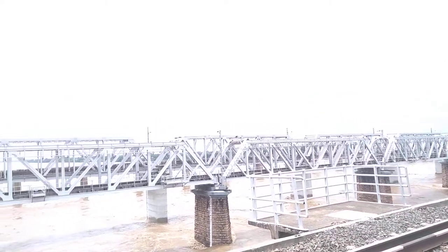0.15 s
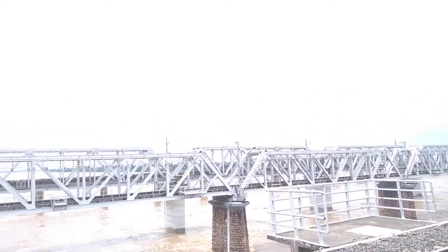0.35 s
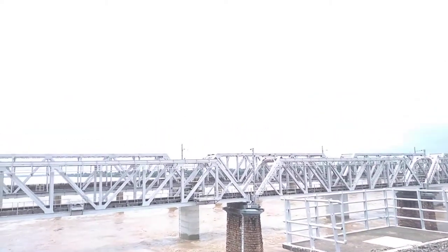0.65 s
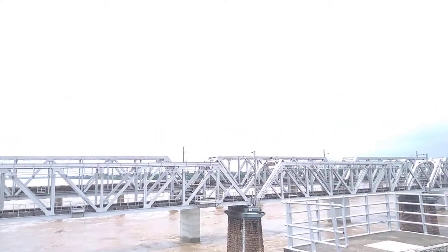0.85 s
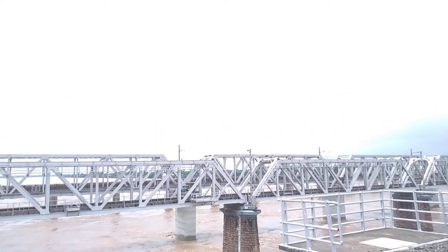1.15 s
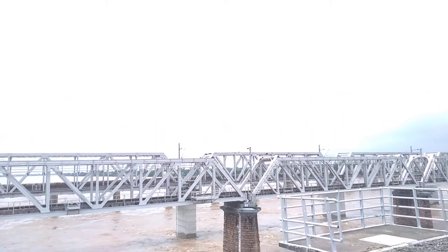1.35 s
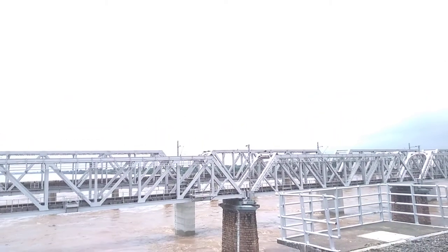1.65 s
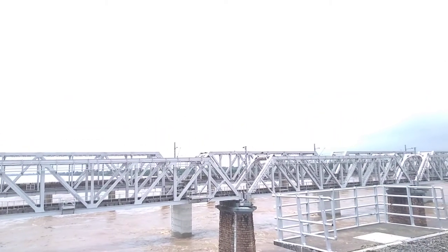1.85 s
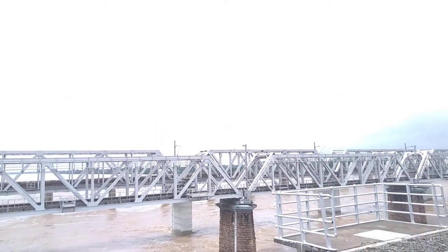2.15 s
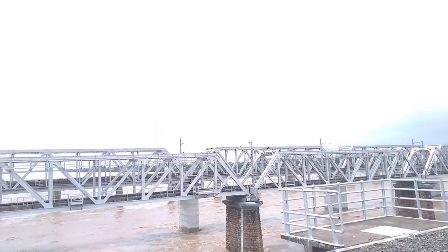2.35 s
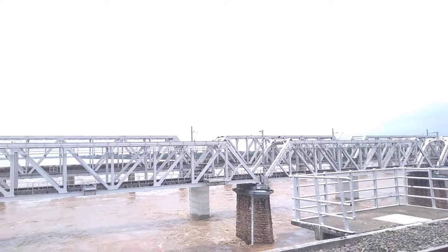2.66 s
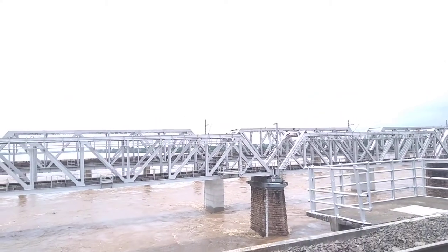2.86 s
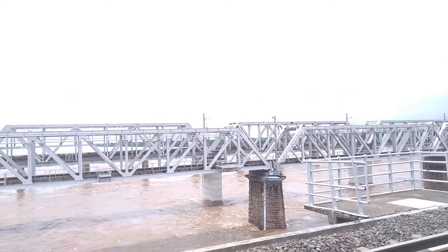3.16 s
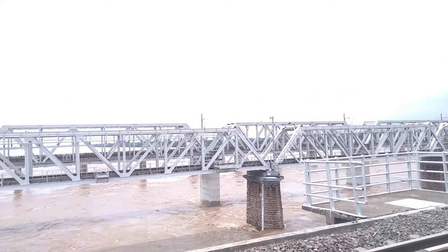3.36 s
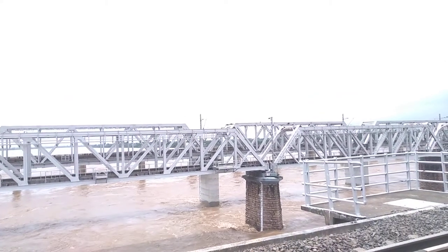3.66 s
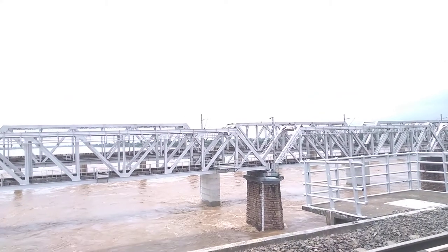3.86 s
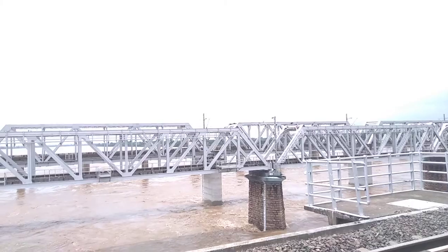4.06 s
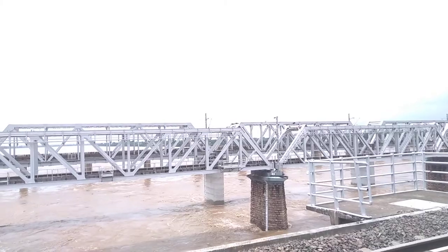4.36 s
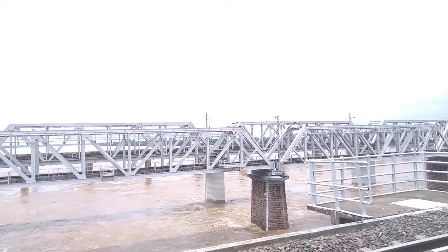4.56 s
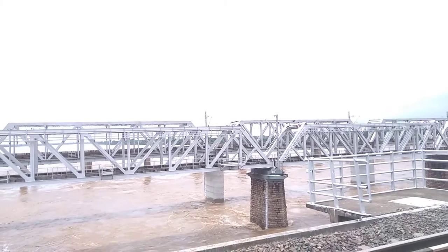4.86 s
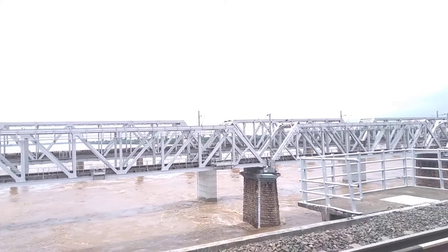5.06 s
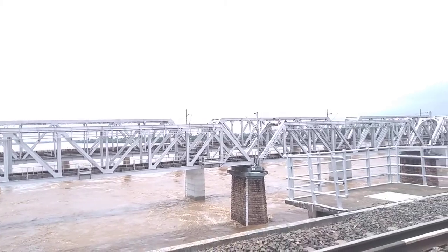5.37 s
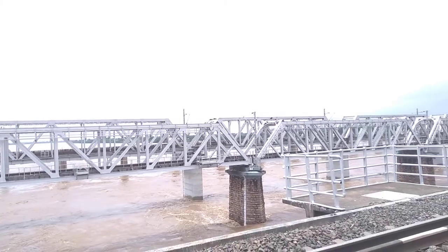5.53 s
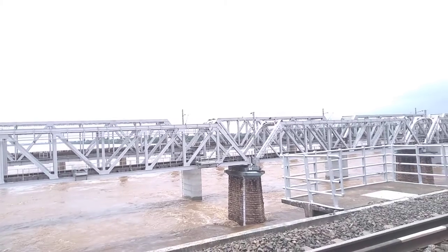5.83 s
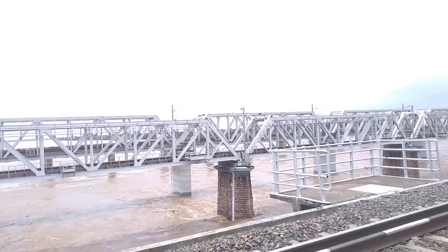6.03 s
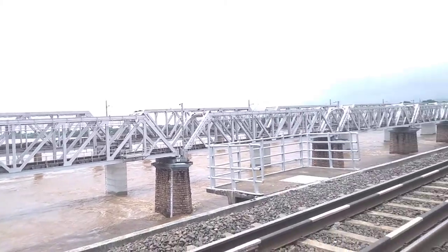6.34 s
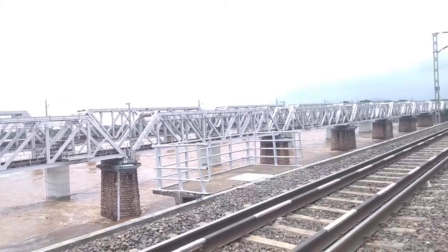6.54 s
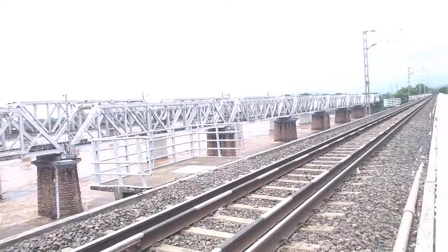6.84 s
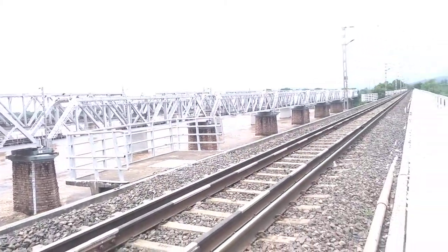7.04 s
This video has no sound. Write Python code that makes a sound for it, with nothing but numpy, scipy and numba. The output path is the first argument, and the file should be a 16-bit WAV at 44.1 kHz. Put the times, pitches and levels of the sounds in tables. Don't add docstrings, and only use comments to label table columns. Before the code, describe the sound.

A flooded river rushes past bridge piers in the open, heard from the bank. The roar is continuous, wide and even, countless splashes and bubbles merging into one mass with only slight quick surges. A hand-held phone in stereo picks up low wind puffs on the right, where the hiss sounds hollow and brighter. No separate events stand out.

```python
import sys
import numpy as np
from scipy import signal
from scipy.fft import rfft, irfft
from scipy.io import wavfile
from scipy.ndimage import uniform_filter1d
from numba import njit

SR = 44100
rng = np.random.default_rng(int(sys.argv[2]) if len(sys.argv) > 2 else 0)


def unload_wav(signal):
    wavfile.write(
        sys.argv[1],
        SR,
        np.round(np.clip(np.atleast_2d(signal).T, -1, 1) * 32767).astype(np.int16),
    )


def attenuation_scalar(level_db):
    decades = np.asarray(level_db, float) / 20
    return 10 ** decades


N = 317475
SECONDS = np.arange(N) / SR
HZ = np.arange(N // 2 + 1) * SR / N


def curves(table):
    s, *columns = np.transpose(table)
    return [np.interp(SECONDS, s, c) for c in columns]


def over_hz(table):
    hz, *columns = np.transpose(table)
    return [np.interp(np.log(HZ + 1), np.log(hz), c) for c in columns]


def shape(x, gain):
    return irfft(rfft(x) * gain, N)


def hump(hz, octaves):
    return np.exp(-.5 * (np.log2((HZ + 1) / hz) / octaves) ** 2)


def lift(x, part, db):
    return x + (attenuation_scalar(db) - 1) * shape(x, part)


def unit(x):
    return x / np.sqrt(np.mean(x ** 2))


def walk(rate):
    hold = int(SR / rate)
    steps = rng.standard_normal(N // 50)[:N // hold + 1]
    slewed = uniform_filter1d(np.repeat(steps, hold), hold)
    return unit(uniform_filter1d(slewed, hold)[:N])


def blows(start_s, peak_db, hold_s, rise, fall):
    tick_s = .005
    late = np.arange(0, N / SR + .01, tick_s) - np.array(start_s)[:, None]
    climb = rise * np.minimum(late, 0)
    decay = fall * np.maximum(late - np.reshape(hold_s, (-1, 1)), 0)
    db = np.array(peak_db)[:, None] + climb - decay
    return np.interp(SECONDS, np.arange(db.shape[1]) * tick_s, db.max(axis=0))


# start_s, peak_db
PUFFS = [(.58, -55.1), (.91, -54.1), (1.26, -49.6), (1.49, -50.3), (1.68, -48.1), (1.93, -50.2), (2.1, -54),
         (2.41, -48), (2.57, -49), (2.78, -48.4), (2.92, -54), (3.22, -51.2), (3.44, -50.6), (3.56, -52.1),
         (3.86, -46.4), (4.06, -48), (4.31, -48.9), (4.52, -54.4), (4.67, -51.9), (4.94, -54.2),
         (5.11, -53.4), (5.25, -49.7), (5.55, -49.5), (5.78, -54.8), (6.19, -52.5), (6.51, -47.5),
         (6.74, -49.2), (7.06, -46.6)]
# start_s, peak_db, hold_s
GUSTS = [
    (0, -53, 0.18),
    (6.2, -63.5, .12),
    (7.08, -55.5, .12),
]


def wind():
    calm_db = -59
    puff_db = blows(*np.transpose(PUFFS), 0, rise=100, fall=80)
    rumble_db = blows(*np.transpose(GUSTS), rise=182, fall=200)
    puff = np.sqrt(np.clip(attenuation_scalar(puff_db) ** 2 - attenuation_scalar(calm_db) ** 2, 0, None))
    air = rng.standard_normal((2, N))
    low_cut = 1 / np.sqrt(1 + (175 / (HZ + 1)) ** 10)
    thud = (hump(280, .55) + .2 * hump(650, .4)) * low_cut
    flutter = attenuation_scalar(1.5 * walk(45))
    thuds = puff * flutter * unit(shape(air[0], thud))
    return thuds + attenuation_scalar(rumble_db) * unit(shape(air[1], hump(154, .45)))


@njit
def svf(x, hz, width):
    y, band, low = np.empty(len(x)), 0., 0.
    for i in range(len(x)):
        g, k = np.tan(np.pi * hz[i] / SR), width / hz[i]
        v = (band + g * (x[i] - low)) / (1 + g * (g + k))
        band, low, y[i] = 2 * v - band, low + 2 * g * v, k * v
    return y


def cavity(near, own, centre_hz, level_db, tilt_khz):
    width_hz, edge_hz, lag_s = 3150.0, 3930, 0.00036
    alike = 0.13
    lead = np.exp(2j * np.pi * (HZ - edge_hz) * lag_s)
    x = alike * shape(near, lead) + np.sqrt(1 - alike ** 2) * own
    x = svf(svf(x, centre_hz, width_hz), centre_hz, width_hz)
    low_edge = 1 / np.sqrt(1 + (edge_hz / (HZ + 1)) ** 40)
    high_edge = 1 / np.sqrt(1 + (HZ / 6500) ** 9)
    hollow = attenuation_scalar(level_db) * unit(shape(x, low_edge * high_edge))
    return lift(hollow, hump(5260, 0.066), -0.5 - 6 * tilt_khz)


def surges(surge_db, flicker_db):
    shared = surge_db * walk(7)
    return [attenuation_scalar(shared + flicker_db * walk(12)) for _ in range(9)]


@njit
def ring(start, hz, size, cycles, glide):
    y = np.zeros(N)
    for e in range(len(start)):
        n = int(3 * cycles * SR / hz[e])
        phase = 0.
        for i in range(min(n, N - start[e])):
            phase += 2 * np.pi * hz[e] / SR * (1 + glide * i / n)
            y[start[e] + i] += size[e] * np.exp(-6. * i / n) * np.sin(phase)
    return y


def water(gains, bubble_db):
    bubbles_per_s = 900
    spray = rfft(rng.standard_normal(N))
    octave = np.log2(np.clip(HZ, 40, 40 * 2 ** 8) / 40)
    hiss = np.zeros(N)
    for k, gain in enumerate(gains):
        hiss += gain * irfft(spray * np.clip(1 - abs(octave - k), 0, 1), N)
    when, pitch, size = rng.random((int(bubbles_per_s * N / SR), 3)).T
    start = (when * N).astype(int)
    loudness = attenuation_scalar(-2.0 * np.log(size + 1e-4))
    bubbles = ring(start, 350 + 2400 * pitch, loudness, 6.5, 0.64)
    return hiss + attenuation_scalar(bubble_db) * unit(bubbles)


# pitch_hz, left_db (per Hz), right_db (per Hz)
PORTS = [(58.5, -100.3, -99), (76.3, -86, -85.5), (97.4, -79.5, -78), (217, -73, -72.5), (389, -75.5, -75),
         (530, -78.5, -79), (722, -74, -75.5), (833, -73.5, -76.5), (1083, -80, -81.5), (1320, -78.5, -78),
         (1750, -84, -78), (1990, -82, -79), (3440, -84, -88.5), (7600, -93.5, -101)]
# pitch_hz, likeness (0-1), right_phase_rad (against left)
PAIR = [(60, .96, -.05), (150, .99, -.12), (300, .987, -.2), (550, .95, -.4), (850, .85, -.38),
        (1050, .45, -.1), (1400, .66, .1), (1800, .4, -.9), (2300, .58, -2.45), (2900, .62, -2.9),
        (3800, .75, -3.1), (4050, .2, -3.1)]
# start_s, likeness_kept (0-1), treble_db, right_middle_db
TURN = [
    (0, .99, -1.8, 1),
    (3.0, 0.91, -2.3, -0.3),
    (6.0, 0.79, -2, -1.1),
    (6.6, 0.76, -1, -3),
    (7.2, 0.7, -0.5, -5),
]


def roar(near, far, other, tilt_khz):
    keep, turn_db, middle_db = curves(TURN)
    left_db, right_db = over_hz(PORTS)
    alike, phase = over_hz(PAIR)
    per_hz = np.sqrt(SR / 2)
    treble = 1 / (1 + (2600 / (HZ + 1)) ** 4)
    treble_db = turn_db - 1.6 * tilt_khz
    left = lift(shape(near, per_hz * attenuation_scalar(left_db)), treble, treble_db)
    left = lift(left, hump(1560, 0.08), 6 * tilt_khz)
    right_gain = per_hz * attenuation_scalar(right_db)
    right = shape(near, right_gain * alike * np.exp(1j * phase))
    right = right + shape(far, right_gain * np.sqrt(1 - alike ** 2))
    middle = hump(870, 0.99)
    spread = np.sqrt(1 - keep ** 2) * shape(other, right_gain * middle)
    right = right - (1 - keep) * shape(right, middle) + spread
    right = lift(lift(right, treble, treble_db), hump(820, 0.2), middle_db)
    return left, right


# start_s, swell_db, cavity_hz
AIM = [(0, 0, 5150), (.8, -0.57, 4620), (1.5, 0.56, 4750), (2.2, 0.43, 4770), (2.6, 0.65, 5350),
       (3.0, -1, 5450), (3.6, 0.4, 5440), (4.2, 0.6, 5300), (4.8, 0, 5430), (5.4, 0.5, 5320),
       (6.0, -0.46, 5330), (6.4, -0.2, 5030), (7.2, -0.5, 5300)]


def scene():
    swell_db, cavity_hz = curves(AIM)
    tilt_khz = (cavity_hz - 5150) / 1000
    gains = surges(.65, .9)
    near, far, other = (water(gains, -20.5) for _ in range(3))
    left, right = roar(near, far, other, tilt_khz)
    cavity_db = -44.5 + 1.4 * swell_db
    hollow = cavity(near, other, cavity_hz, cavity_db, tilt_khz)
    return np.array([attenuation_scalar(swell_db) * left, attenuation_scalar(swell_db) * right + hollow + wind()])


def drop_blocks(x, table, hold, size=8):
    lead = 405
    window = dict(nperseg=2048, noverlap=1024, window="cosine")
    hz, s, z = signal.stft(np.roll(x, lead, axis=-1), SR, **window)
    band = np.arange(len(hz)) // size
    chance = signal.lfilter([1], [1, -hold], rng.standard_normal((band[-1] + 1, len(s))))
    rank = chance.argsort().argsort() / len(s)
    share = np.interp((band + .5) * size * hz[1], *np.transpose(table), left=0, right=0)
    y = signal.istft(z * (rank[band] >= share[:, None]), SR, **window)[1]
    return np.roll(y[..., :N], -lead, axis=-1)


def low_pass(x):
    return signal.sosfilt(signal.butter(12, 14000, fs=SR, output="sos"), x)


# pitch_hz, dropped_share (0-1)
EDGE_DROPS = [(7600, .02), (7850, 0.29), (8050, 0.88), (8200, 0.91)]
# pitch_hz, dropped_share (0-1)
MID_DROPS = [(2400, .03), (2584, .12), (2928, .42), (3273, .62), (3618, .93), (3790, .93)]
# pitch_hz, dropped_share (0-1)
TRACE_DROPS = [(8980, .3), (12650, .35), (12850, .95), (14500, .995)]
# pitch_hz, dropped_share (0-1)
SLOT_DROPS = [(8200, .86), (8980, .86)]


def record(dry):
    high_cut = (HZ < 8120) / np.sqrt(1 + (HZ / 8030) ** 70)
    low_cut = 1 / np.sqrt(1 + (48 / (HZ + 1)) ** 3)
    pair = np.array([shape(c, high_cut * low_cut) for c in dry])
    left, right = drop_blocks(pair, EDGE_DROPS, 0.6)
    mid, side = (left + right) / 2, (left - right) / 2
    mid = drop_blocks(mid, MID_DROPS, .25, size=16)
    hiss = rng.standard_normal((4, N))
    trace = attenuation_scalar(-69) * hump(7360, 0.46) * (HZ > 8960)
    slot = attenuation_scalar(-68) * (HZ > 8270) * (HZ < 8940)
    slots = drop_blocks(np.array([shape(h, slot) for h in hiss[2:]]), SLOT_DROPS, 0.26, size=14)
    mid = mid + drop_blocks(shape(hiss[0], trace), TRACE_DROPS, 0.22, size=4) + slots[0]
    side = side + drop_blocks(shape(hiss[1], trace), TRACE_DROPS, 0.22, size=4) + slots[1]
    return low_pass(np.array([mid + side, mid - side]))


dry = scene()
out = record(dry)
unload_wav(out)
```